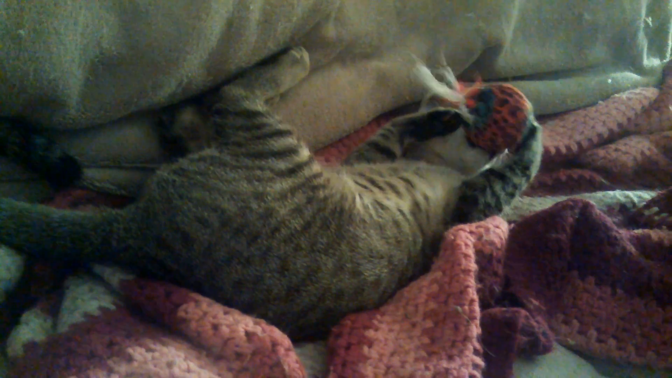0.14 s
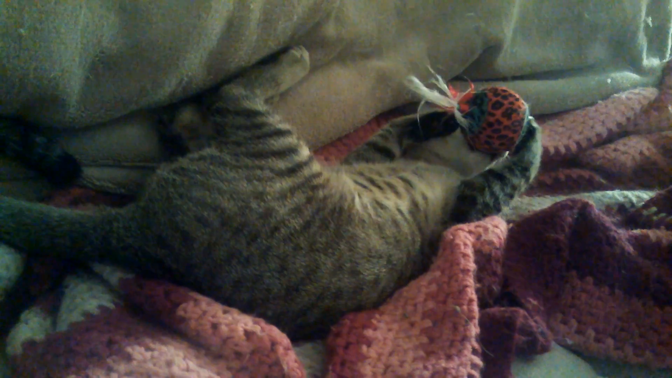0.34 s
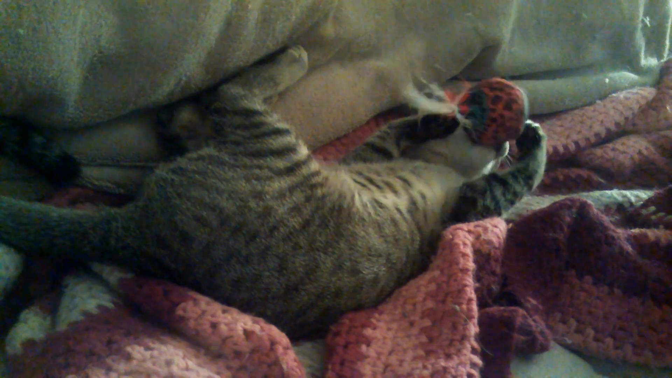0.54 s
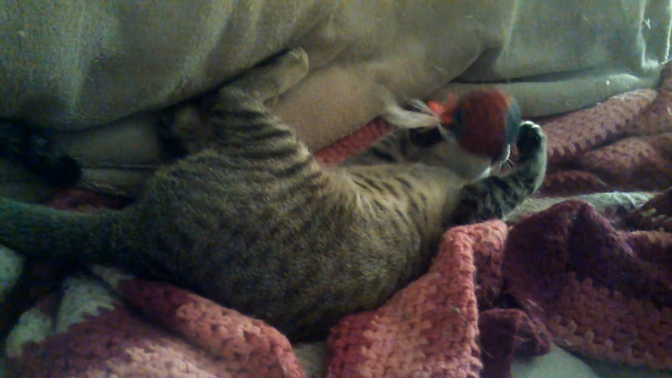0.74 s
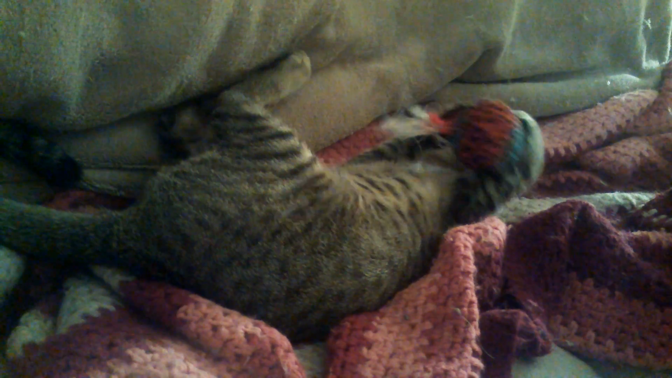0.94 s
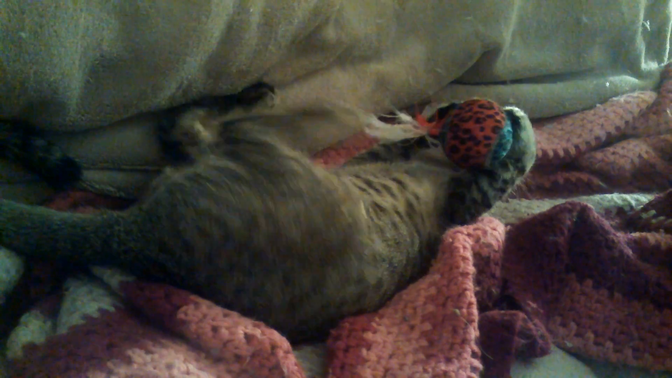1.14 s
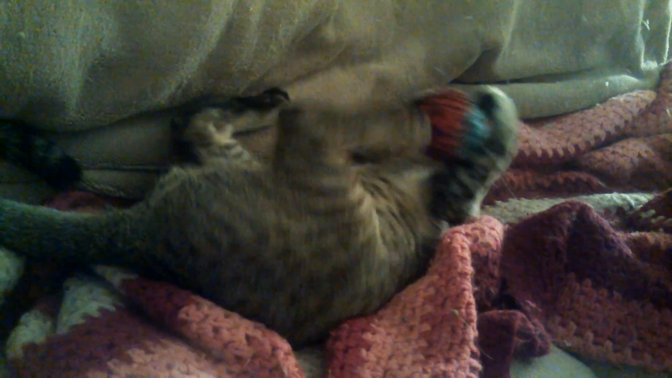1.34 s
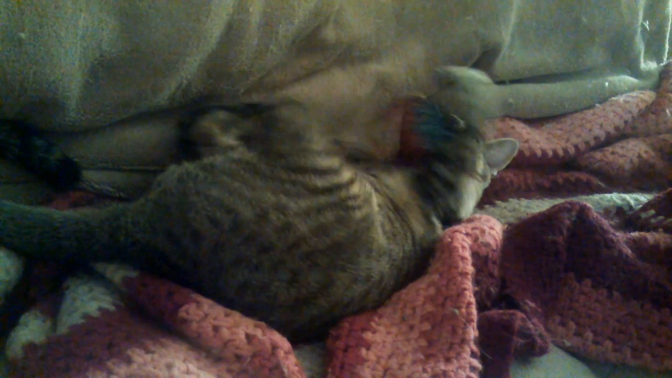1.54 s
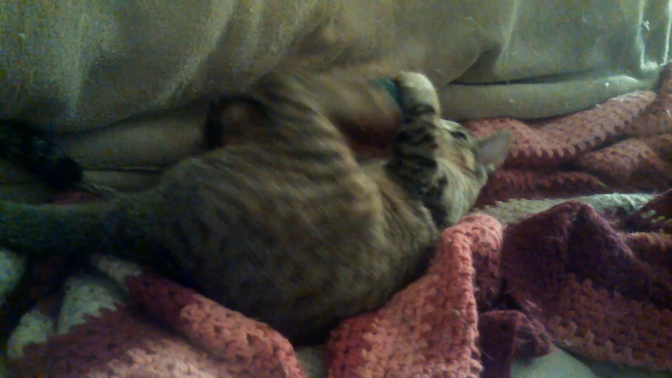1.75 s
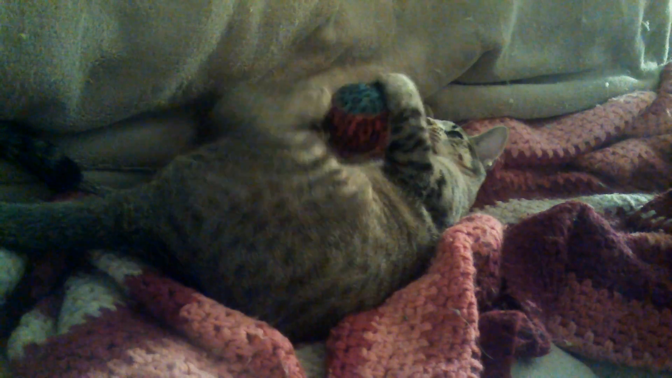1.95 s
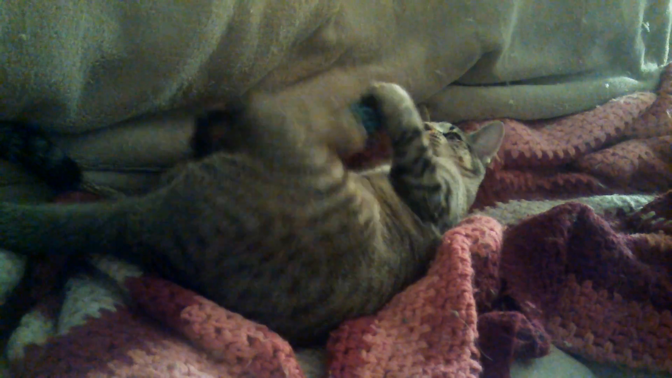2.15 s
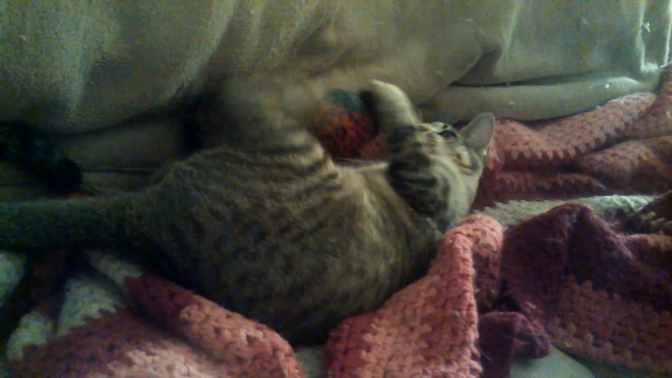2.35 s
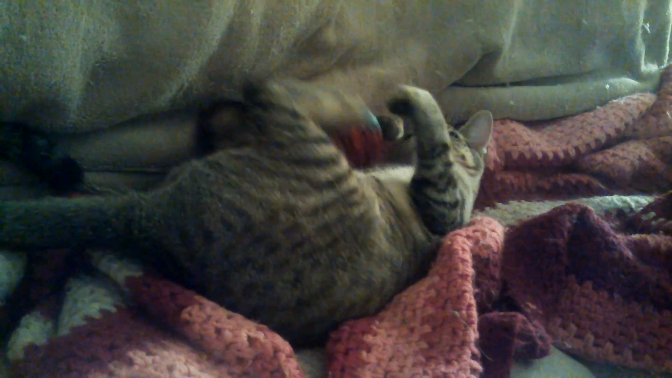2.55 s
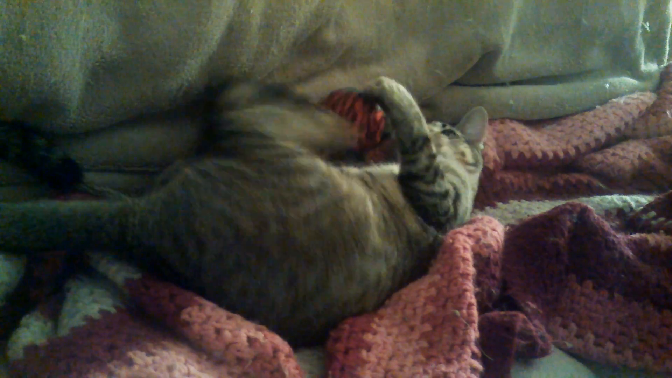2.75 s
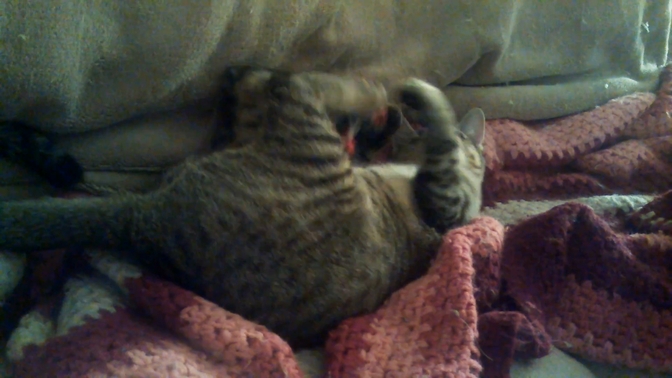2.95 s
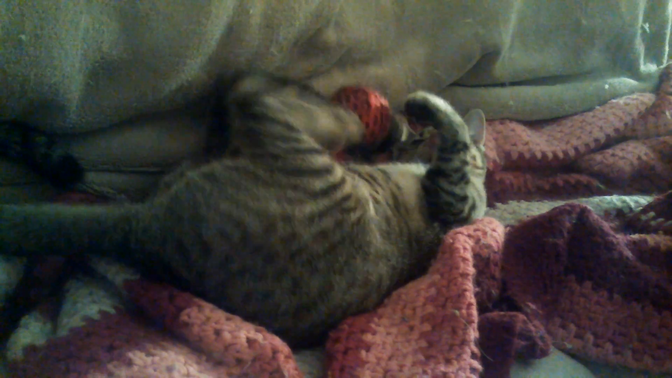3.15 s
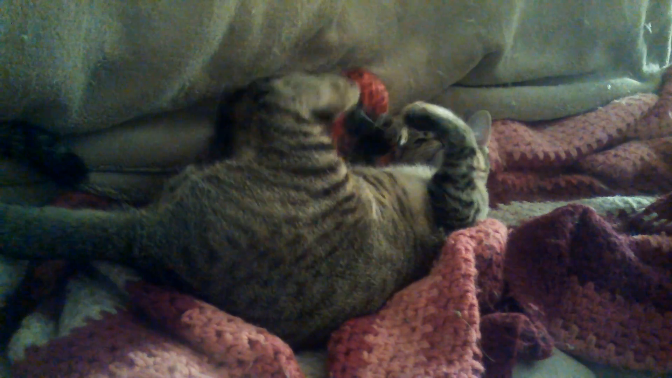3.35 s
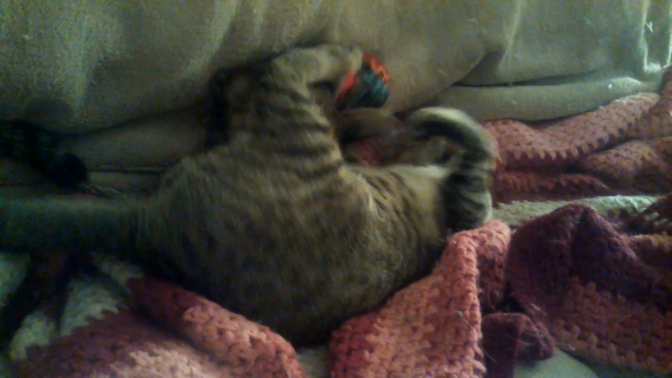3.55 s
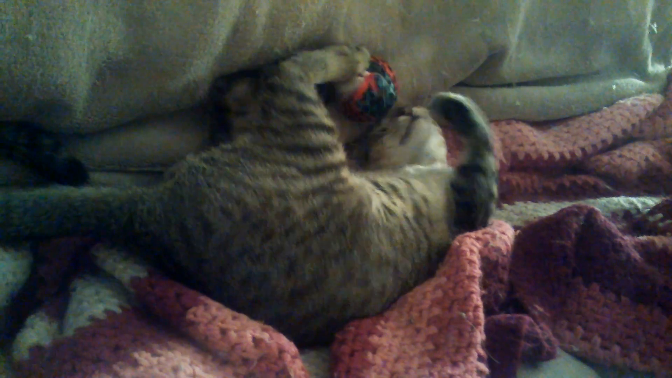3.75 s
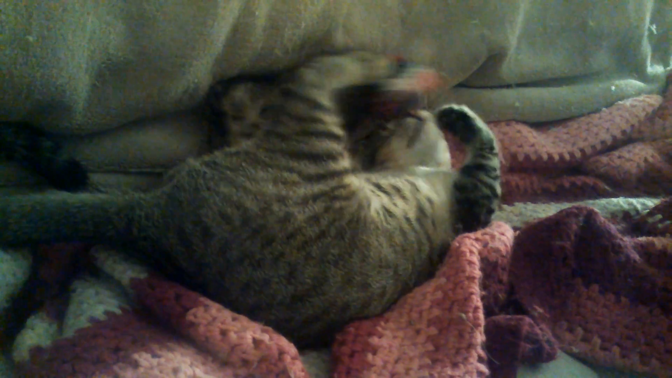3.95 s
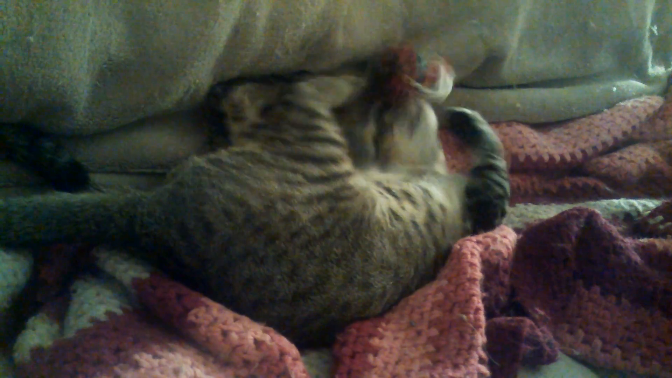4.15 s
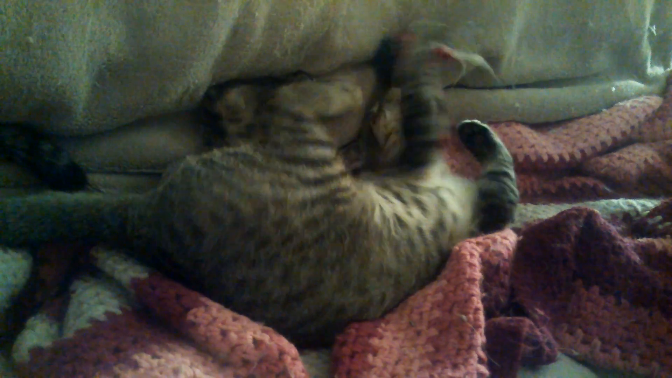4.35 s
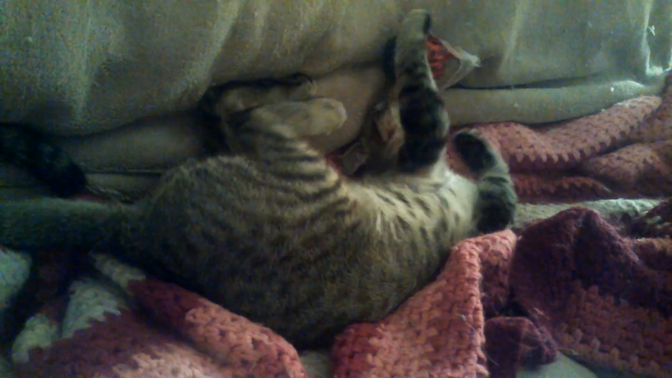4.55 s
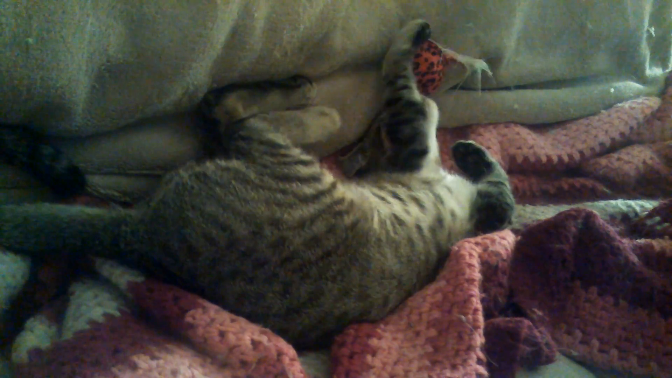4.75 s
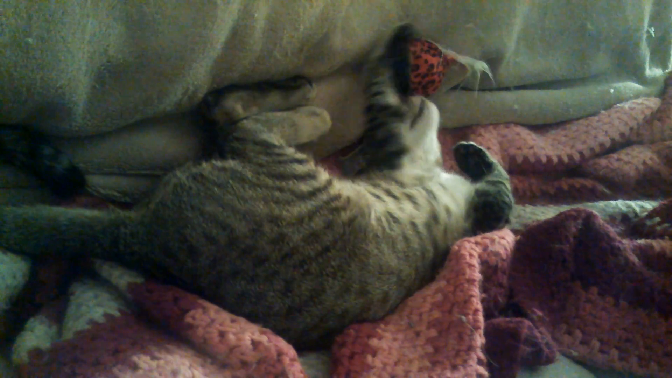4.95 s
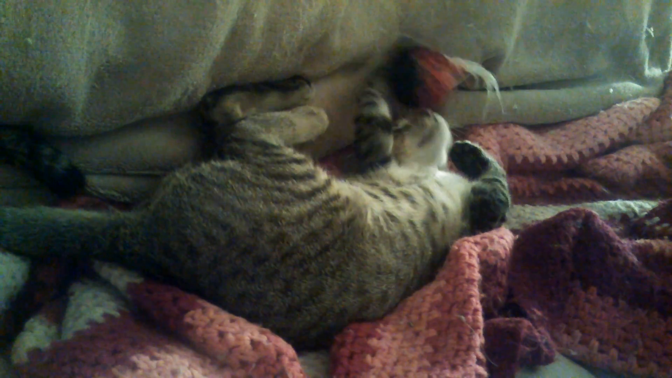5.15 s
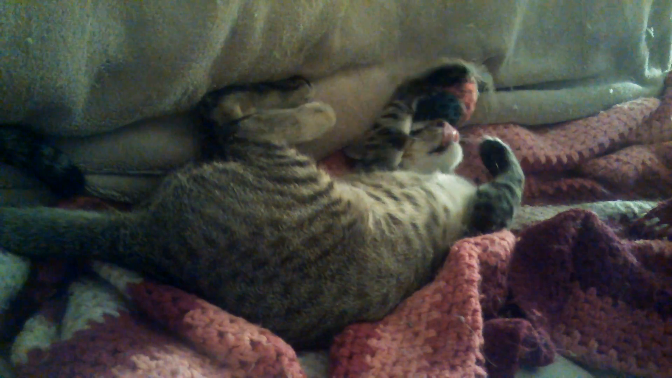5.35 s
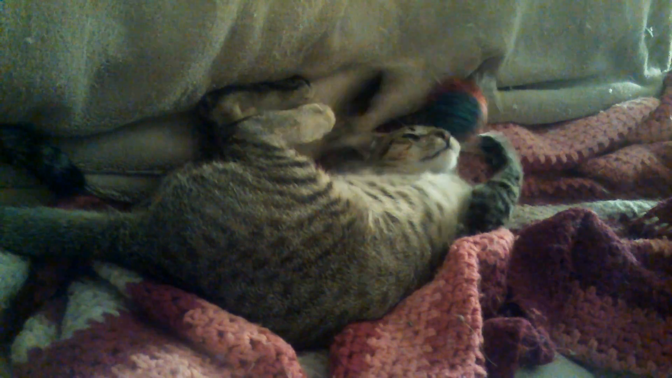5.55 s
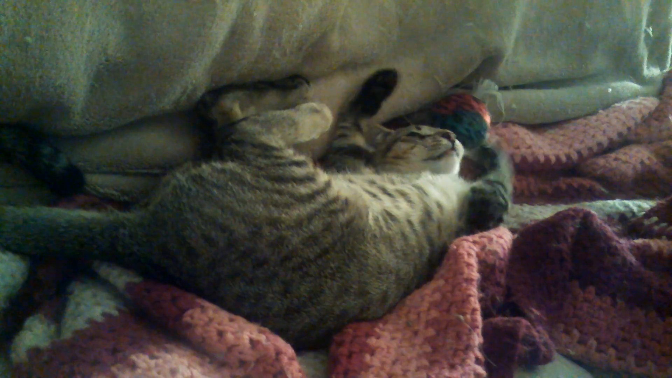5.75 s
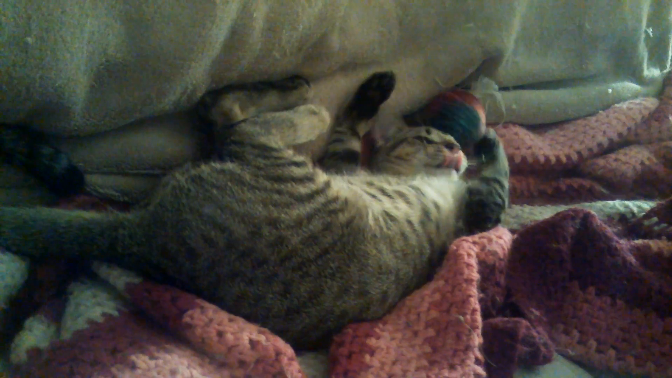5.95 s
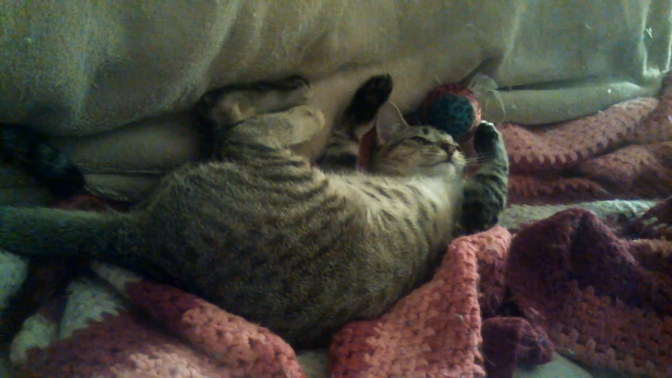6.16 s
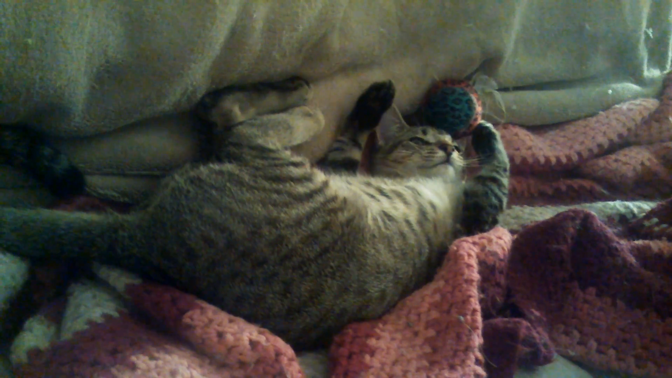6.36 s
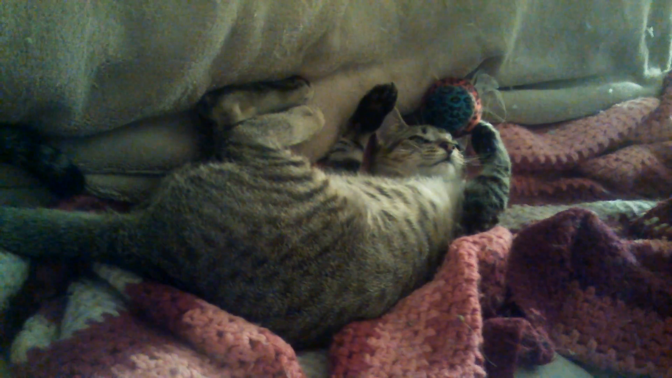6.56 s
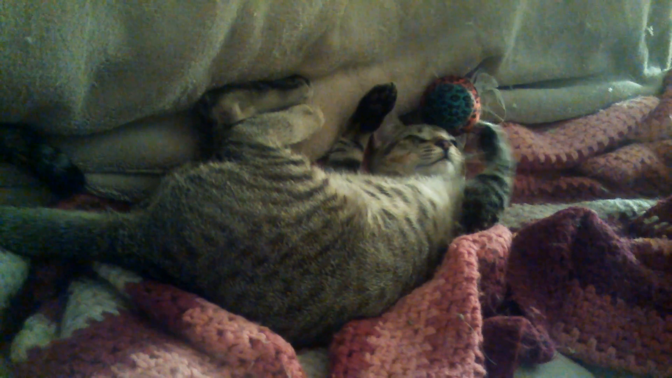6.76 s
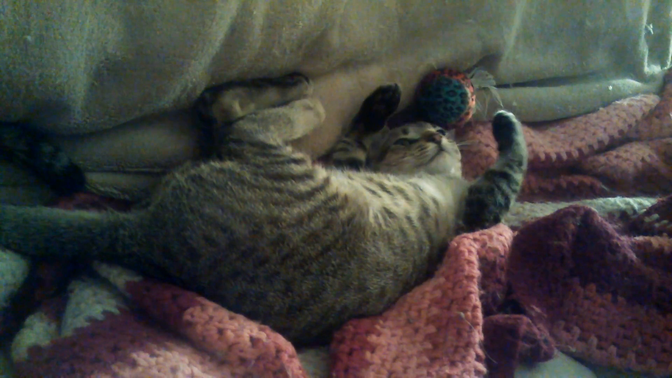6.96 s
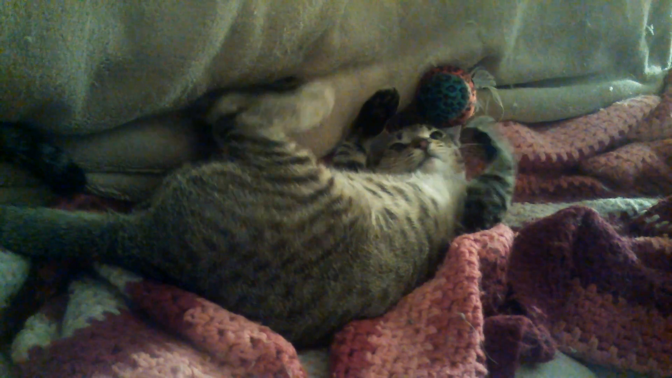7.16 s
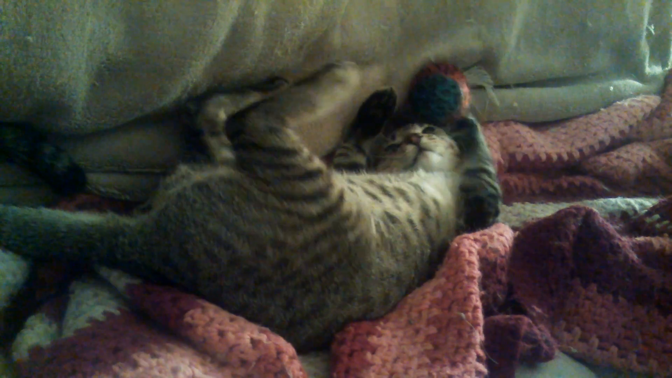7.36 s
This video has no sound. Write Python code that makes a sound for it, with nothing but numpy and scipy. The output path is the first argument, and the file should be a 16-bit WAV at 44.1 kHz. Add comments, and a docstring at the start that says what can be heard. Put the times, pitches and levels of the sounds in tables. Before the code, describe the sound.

A light rattle inside a wool-covered hollow ball is shaken by paws: quick dry clicks, muffled clacks and thin high tinkles, mixed with fibre rustle, brief claw scrapes and soft fur brushing cloth. Bursts come and go, peaking shortly after two seconds and growing busy again near four. One abrupt dry pop interrupts the lull between. The ending is almost still. Handheld microphone very close, wide stereo, barely any reverberation, dull low room rush.

```python
"""Cat with a rattling yarn ball

A cat lies on a blanket in a quiet room, kicking and clawing a yarn ball with a little rattle inside.
The bead's strikes are short noise cracks that set damped sines ringing: the ball's hollow and the shell.
Fur, wool and claws are filtered noise and tiny snaps shaped by the cat's moves; one sharp pop is a brief pulse.
Dull room noise and a faint hum lie below. A close handheld recorder with two ports is widened to stereo."""
import sys
import numpy as np
from scipy import signal
from scipy.fft import rfft, irfft
from scipy.io import wavfile

SR = 44100
rng = np.random.default_rng(int(sys.argv[2]) if len(sys.argv) > 2 else 0)


def file_out(sig):
    """Save sig as 16-bit WAV at sys.argv[1]."""
    # one column per channel
    cols = np.atleast_2d(sig).T
    # limit, then scale
    lim = np.clip(cols, -1, 1)
    pcm = np.round(lim * 32767).astype(np.int16)
    wavfile.write(sys.argv[1], SR, pcm)


N = 329868
TIME = np.arange(N) / SR

# main strikes of the bead on the shell, levels before each layer's trim:
# (time [s], crack level [dB], hollow knock level [dB], low ring level [dB], high ring level [dB])
BEAD_STRIKES = [(0.0918, -50, -45, -69, -60), (0.1231, -24.5, -41, -56, -37), (0.1391, -28, -36, -48, -39),
                (0.1516, -40, -28, -53.5, -54.0), (0.1718, -39, -43, -54, -50),
                (0.1945, -36, -29.5, -54, -56.5), (0.224, -41.5, -37, -57, -50),
                (0.2846, -35, -36.5, -50.5, -47), (0.5569, -38.5, -34.5, -58, -55),
                (0.5869, -50, -41, -62, -59), (0.6218, -54, -37, -61, -63), (0.6267, -45, -41, -59, -56),
                (0.636, -47, -41, -65, -61), (0.6679, -49, -41, -59, -59), (0.6815, -30, -41, -52, -34),
                (0.702, -49, -35, -45, -38.5), (0.709, -37, -46, -46.5, -53),
                (0.714, -37, -31, -50.5, -59.0), (0.724, -50, -45, -64, -45), (0.7574, -57, -42, -60, -47),
                (0.807, -46, -39, -55, -52), (0.815, -43.0, -56.0, -48, -43), (0.82, -41, -49, -51, -42),
                (0.8402, -39, -35, -75.5, -49), (0.8498, -39, -34, -58, -57), (0.8925, -42, -49, -58, -53),
                (0.9012, -47, -48, -62, -57), (0.9925, -31, -59, -42.5, -54), (1.0174, -41, -40, -55, -43),
                (1.0312, -40, -48, -46, -67.5), (1.039, -38, -35, -66, -47),
                (1.2257, -33.5, -36, -48, -68.5), (1.277, -46, -52, -64, -54), (1.3068, -28, -44, -42, -55),
                (1.315, -30, -42, -45, -39), (1.3408, -55, -36, -66, -62), (1.4221, -35.5, -33.5, -49, -67),
                (1.4528, -38, -44, -51, -69.5), (1.5375, -40, -35, -42.5, -59.5),
                (1.567, -41, -38.0, -58, -49), (1.57, -41, -39, -53, -44), (1.5778, -44, -39, -44, -59.5),
                (1.646, -32.5, -31, -45.5, -50), (1.6879, -36, -36, -60, -35.5),
                (1.7435, -48, -39, -53, -50), (1.757, -50, -38, -51, -51), (1.798, -42, -28, -44.5, -65.5),
                (1.831, -44, -55, -42, -40), (1.8445, -36, -31, -50, -53), (1.859, -46, -40, -57, -44),
                (1.8943, -49.0, -29.5, -49, -46), (1.902, -43.5, -27, -51, -52.5),
                (1.912, -50, -24, -57, -43.5), (1.9298, -43, -44, -61, -53), (1.941, -42, -52, -44, -36.5),
                (1.9482, -52, -26.5, -52, -45), (1.9842, -50, -46, -54, -44), (2.1036, -41, -39, -54, -44),
                (2.1143, -38, -28, -51.5, -47), (2.1436, -43, -21.5, -55, -42),
                (2.1515, -21.5, -15.5, -33.5, -24.5), (2.1582, -37.5, -45, -58, -42.5),
                (2.1692, -27, -31, -52, -34), (2.1784, -34, -25, -56, -52.0),
                (2.1836, -31, -28, -42.5, -37.5), (2.2096, -35, -52, -47.0, -62.5),
                (2.217, -35, -31, -65.5, -63.0), (2.2276, -41, -33, -61, -41),
                (2.2408, -38, -27, -54, -68.0), (2.3733, -43, -35, -70, -63), (2.387, -47.5, -37, -64, -57),
                (2.408, -39, -42, -48, -68.5), (2.4644, -27.5, -26.5, -36, -28),
                (2.4861, -34, -36, -54, -30.5), (2.4953, -49, -42, -66, -48), (2.5218, -54, -44, -67, -41),
                (2.5617, -46, -29, -51, -46), (2.5703, -56, -41, -69, -49), (2.5835, -54, -36.5, -68, -45),
                (2.5995, -43, -30.5, -54, -45), (2.6257, -52, -51, -67.0, -44.5),
                (2.6318, -45, -46, -55, -40), (2.652, -48, -38, -65, -43), (2.664, -53, -33, -78.5, -36.5),
                (2.671, -56, -48.5, -70, -53), (2.6842, -57, -30.5, -53, -49),
                (2.706, -52, -33, -66, -38.5), (2.9989, -45, -54, -69, -64), (3.0063, -49, -59, -66, -54),
                (3.071, -59, -30, -58, -57.5), (3.0754, -53, -56.5, -69, -51), (3.1052, -34, -38, -52, -38),
                (3.1123, -46, -37.5, -51, -44.0), (3.122, -37, -34, -51, -39), (3.2583, -45, -41, -59, -51),
                (3.476, -44, -40, -73, -61), (3.7515, -38.0, -37, -64.5, -44),
                (3.7685, -29.5, -29.5, -67, -34), (3.7836, -28, -46, -51, -39), (3.804, -36, -23, -60, -40),
                (3.8182, -33, -52.5, -47, -44), (3.841, -38, -53, -51, -39), (3.9076, -41, -40, -63, -61),
                (3.9335, -45, -46, -60, -55), (3.96, -45, -42, -60, -57), (3.9793, -43, -48, -58, -46),
                (4.0878, -35, -32, -38, -57.5), (4.1001, -36, -32.5, -42, -72.0),
                (4.109, -31, -29.5, -59, -33), (4.1433, -40, -29, -39.5, -41.5),
                (4.1605, -34, -32, -40.5, -38.5), (4.2121, -41, -38, -53, -61),
                (4.2479, -36, -34, -43.5, -53), (4.262, -35, -38, -43.5, -67),
                (4.293, -39, -29, -40.5, -54), (4.3028, -33, -27, -62.5, -52.5),
                (4.3166, -37, -29, -41, -43), (4.3346, -31.5, -41, -44, -54.0),
                (4.3497, -47, -34, -52, -50), (4.392, -42, -50, -46, -61.5), (4.4135, -34.5, -25, -49, -40),
                (4.4215, -56.5, -55, -68, -38), (4.442, -53.0, -36, -47.5, -43),
                (4.4634, -47, -32, -65, -54), (4.5283, -56, -43, -52, -67), (4.5395, -58, -39, -62, -67),
                (4.5548, -62, -40, -64, -75), (4.5952, -61, -47, -52, -71), (5.0755, -47, -55, -67, -72),
                (5.1101, -27.5, -28.5, -50, -39), (5.1145, -29, -26.5, -63.5, -40),
                (5.131, -27.5, -33, -52, -48.5), (5.138, -45, -33, -62, -40), (5.149, -49, -43, -69.5, -43),
                (5.171, -32, -42.5, -67.0, -50.5), (5.182, -45, -42.5, -56, -37),
                (5.1982, -26, -29, -61, -48.0), (5.225, -45, -34.5, -52.5, -36.5),
                (5.27, -44, -48, -65, -49), (5.3095, -47, -42, -59, -72), (5.3835, -46, -47, -62, -77.0),
                (5.46, -43, -35, -65, -50), (5.4854, -49, -40, -67, -54), (5.5089, -44.0, -30, -60, -39),
                (5.512, -42, -33.5, -72, -36), (5.5581, -58, -41, -75, -60), (5.6497, -47, -54, -65, -70),
                (5.6894, -52, -45, -73.0, -53), (5.7172, -52, -40, -79, -52), (6.055, -46, -47, -77, -68),
                (7.352, -59, -42, -72, -51), (7.374, -62, -49, -77, -53)]
# ringing modes of the shell: (pitch [Hz], relative level [dB], time to fall by 60 dB [s])
SHELL_MODES = [(3693, -7, 0.03), (5005, -3.5, 0.037), (5046, -2, 0.056), (5660, -5.5, 0.042),
               (10900, -16, 0.028), (11370, -4, 0.035), (12200, -14, 0.017), (12440, -8, 0.12),
               (12440, 0.5, 0.031), (12670, -6, 0.012), (13050, -5, 0.011), (13600, -7, 0.0052),
               (15300, -10, 0.005)]
# resonances of the ball's hollow: (pitch [Hz], relative level [dB], time to fall by 60 dB [s])
HOLLOW_MODES = [(1510, -14, 0.005), (1674, -6, 0.0063), (1873, -4, 0.0078), (2154, -6, 0.0065),
                (2400, -11, 0.0013)]
# swipes, kicks and tugs of the cat, levels before each layer's trim:
# (start [s], length [s], rub on the wool [dB], knocking of the bead [dB], jingle [dB])
CAT_MOVES = [(0.077, 0.12, -58, -51, -60), (0.552, 0.12, -66, -50, -68), (0.679, 0.014, -50.5, -30, -35.5),
             (0.805, 0.025, -53, -37.5, -50), (0.91, 0.1, -57, -56, -59), (1.245, 0.083, -61, -49, -61),
             (1.426, 0.018, -53.5, -57, -64), (1.546, 0.13, -55.5, -43, -47.5),
             (1.726, 0.063, -55.5, -44, -53), (1.793, 0.055, -51.5, -32.5, -54),
             (1.884, 0.067, -53, -51, -48), (2.135, 0.13, -58, -37, -49), (2.373, 0.012, -63, -43, -58),
             (2.501, 0.019, -51, -29.5, -55), (2.597, 0.0092, -45.5, -35, -39),
             (2.646, 0.047, -55, -46, -51), (2.948, 0.093, -60.5, -72, -64), (3.072, 0.01, -53.5, -52, -54),
             (3.108, 0.022, -51, -60, -57), (3.233, 0.16, -78, -68, -58), (3.75, 0.13, -55.5, -44, -51),
             (3.887, 0.073, -60.5, -43.5, -52), (4.064, 0.14, -57, -43.5, -52),
             (4.268, 0.052, -51, -34, -51), (4.398, 0.09, -57.5, -47, -67), (4.512, 0.059, -65, -38, -77),
             (5.118, 0.067, -56, -53, -52), (5.273, 0.038, -70, -50, -75), (5.462, 0.041, -61, -51, -70),
             (5.684, 0.034, -76, -60, -62)]
# the cat never lies quite still: (time [s], relative level [dB])
FIDGET_LEVEL = [(0.0, -65.5), (1.1, -71), (3.3, -63), (4.8, -69.5), (5.6, -66), (6.6, -76), (7.48, -67.5)]
# the ball is knocked against the cat's body: (time [s], relative level [dB])
BODY_THUDS = [(2.15, -39), (3.806, -57), (4.415, -47), (5.109, -47.5)]
# a claw drags over a taut thread: (start [s], length [s], pitch [Hz], level [dB])
CLAW_SCRAPES = [(0.131, 0.018, 2350, -48), (3.07, 0.014, 3770, -47), (5.648, 0.0062, 6100, -60)]
# fur brushes the cloth: (start [s], length [s], level [dB])
FUR_BRUSHES = [(0.082, 0.037, -60), (0.807, 0.023, -56), (1.784, 0.049, -48), (3.358, 0.032, -62),
               (3.498, 0.023, -51.5), (4.052, 0.076, -50)]
# room noise, sinking a little at the end: (time [s], relative level [dB])
ROOM_LEVEL = [(0.0, -57.5), (6.3, -57.5), (7.48, -60.5)]
# faint hum in the room: (pitch [Hz], level around which it wavers [dB])
HUM_TONES = [(199.2, -62.5), (402, -72)]
# tone colour of the bead's cracks: (frequency [Hz], gain [dB])
CRACK_SPECTRUM = [(300, -12), (1200, -26.5), (2000, -10), (2800, -18), (4000, -7), (6800, -7), (9200, -1),
                  (11000, -1), (13000, -4), (15300, -3)]
# tone colour of the dull bumps: (frequency [Hz], relative gain [dB])
THUD_SPECTRUM = [(80, -18), (200, -10), (450, 2), (900, -23), (1450, 11), (2200, -21), (6000, -32)]
# tone colour of the wool: (frequency [Hz], relative gain [dB])
WOOL_SPECTRUM = [(300, -2), (1100, -26), (2000, 8.5), (2800, -3), (4000, 5), (6500, -5.5), (9200, 0.5),
                 (11000, -15), (13000, 2.5), (15300, -1.5)]
# tone colour of the fur: (frequency [Hz], relative gain [dB])
FUR_SPECTRUM = [(1000, -28), (4000, -7), (6500, -1), (9000, 0), (12000, -3), (15000, 1.5)]
# tone colour of the room noise: (frequency [Hz], relative gain [dB])
AIR_SPECTRUM = [(20, -23), (38, 2), (60, 7), (110, 1), (200, -0.5), (400, -3.5), (600, -10.5),
                (1000, -15.5), (1500, -19), (2450, -24.5), (3200, -24.5), (5000, -30), (9000, -28.5),
                (11000, -31.5), (15000, -28)]

HIGH_RING_FROM_HZ = 8000
DETUNE_STEP = 0.0028  # share of the pitch per detuning step
REBOUND_S, REBOUND_LOSS_DB = 0.01, 14.5  # mean gap, mean loss on each rebound
MOVE_ATTACK_S, MOVE_RELEASE_S = 0.01, 0.042
# delay from port to port in samples: for sound from the side, and from the ball's hollow on the left
PORT_LAG, HOLLOW_LAG = 16, 8
CUTOFF_HZ = 15500


def all_strikes(count=700, spread_db=5.5, vary_db=1.0, idle_db=-11.0):
    """Between main strikes and rebounds the bead chatters unevenly, as hard as the cat moves the ball."""
    times = (np.arange(count) + rng.random(count)) / count * TIME[-1]
    chance = rng.standard_normal((count, 5))
    idle = from_db(np.interp(times, *np.transpose(FIDGET_LEVEL)) + idle_db)
    rub, knocking, jingle = (np.hypot(effort(times, CAT_MOVES, column=k), idle) for k in range(3))
    # crack, knock, low ring and high ring, each with its trim in dB
    levels = 20 * np.log10(np.transpose([rub, knocking, knocking, jingle])) + [-2.0, -2.5, -23.0, -5.0]
    # a shared chance makes a whole strike hard or soft; the rest varies each layer alone
    levels = levels + spread_db * np.minimum(chance[:, :1], 1.5) + vary_db * chance[:, 1:]
    chatter = np.column_stack([times, levels])
    return np.vstack([BEAD_STRIKES, rebounds(), chatter])


def rebounds(count=2, vary_db=4.5):
    """After a main strike the bead bounces on, unevenly and on average ever more weakly."""
    rows, out = np.array(BEAD_STRIKES), []
    for _ in range(count):
        gaps = REBOUND_S * (.5 + rng.random((len(rows), 1)))
        changes = vary_db * rng.standard_normal(rows[:, 1:].shape) - REBOUND_LOSS_DB
        rows = rows + np.hstack([gaps, changes])
        out.append(rows[rows[:, 0] < TIME[-1]])
    return np.vstack(out)


def cracks(strikes, crack_db=2.0, crack_s=0.00034, left_db=4.5, direct_db=-1.5):
    """Each contact is a very short crack of noise, then a faint skid of the bead."""
    rise_s, skid_db, skid_s = .0001, -15.0, .0018
    times, db = strikes.T[:2]
    power = fade(clicks_at(times, from_db(db) ** 2), rise_s) / (rise_s * SR)
    envelope = np.sqrt(fade(power, crack_s) + from_db(skid_db) ** 2 * fade(power, skid_s))
    direct = from_db(direct_db) * from_right(envelope * rng.choice([-1, 1], N))
    diffuse = lean(left_db) * envelope * rng.choice([-1, 1], (2, N))
    return from_db(crack_db) * colour(diffuse + direct, CRACK_SPECTRUM)


def knocks(strikes, knock_db=0.5, scatter_db=-14.0, vary_db=3.0):
    """The hollow of the ball answers each strike with damped sines; the yarn damps it at once."""
    times, _, db = strikes.T[:3]
    out = np.zeros((2, N))
    for k, (hz, mode_db, t60) in enumerate(HOLLOW_MODES):
        chance = rng.standard_normal((len(times), 3))
        # neighbouring modes start with opposite sign
        direct = (-1) ** k * clicks_at(times, from_db(db + mode_db + vary_db * chance[:, 0]))
        scatter_size = from_db(db + mode_db + scatter_db)
        scattered = np.array([clicks_at(times, scatter_size * c) for c in chance.T[1:]])
        out += ring(np.array([direct, late(direct, HOLLOW_LAG)]) + scattered, hz, t60)
    return from_db(knock_db) * no_bass(out)


def shell(strikes, low_db=4.0, high_db=0.5, right_db=-13.0, vary_db=2.0):
    """Each strike starts all shell modes with new strengths, each mode at random a little flat or sharp."""
    times, _, _, low, high = strikes.T
    push = rng.choice([-1, 1], len(times))
    out = np.zeros((2, N))
    for hz, mode_db, t60 in SHELL_MODES:
        chance = rng.standard_normal((len(times), 2))
        detunings = rng.integers(-2, 3, len(times))
        db = high + high_db if hz > HIGH_RING_FROM_HZ else low + low_db
        size = push * from_db(db + mode_db + vary_db * chance[:, 0])
        for step in range(-2, 3):
            chosen = size * (detunings == step)
            left = clicks_at(times, chosen)
            right = clicks_at(times, from_db(right_db) * chosen * chance[:, 1])
            out += ring(np.array([left, right]), hz * (1 + step * DETUNE_STEP), t60)
    return no_bass(out)


def no_bass(x, edge_hz=1070.0):
    """High-pass that keeps the knocks and the shell's ringing free of low tones."""
    return signal.sosfilt(signal.butter(2, edge_hz, "high", fs=SR, output="sos"), x)


def thuds(thud_s=0.0043):
    """The ball bumps dully on the cat's body: noise whose power dies away with this time constant."""
    times, db = np.transpose(BODY_THUDS)
    envelope = np.sqrt(fade(clicks_at(times, from_db(db) ** 2), thud_s))
    return envelope * rms_one(colour(rng.standard_normal((2, N)), THUD_SPECTRUM))


def wool(direct_db=-6.0, left_db=-4.5):
    """Fibres slip under the paws as a hiss, and snag on the claws as separate tiny snaps."""
    rub_db, snag_db, patchy_db = -6.5, -3.3, 1.5
    snag_s, snags_per_s, snag_spread_db = .0003, 200, 3.2
    snags = rms_one(np.sqrt(fade(grains(snags_per_s, snag_spread_db) ** 2, snag_s)))
    direct = from_db(direct_db) * from_right(rng.standard_normal(N))
    slips = lean(left_db) * rng.standard_normal((2, N)) + direct
    hiss = from_db(rub_db) * rms_one(colour(slips, WOOL_SPECTRUM))
    snaps = from_db(snag_db) * rms_one(colour(slips * snags, WOOL_SPECTRUM))
    return rubbing() * from_db(patchy_db * drift(rate=58)) * (hiss + snaps)


def rubbing():
    """Gain of the rubbing on the wool: the moves on top of the fidgeting."""
    coarse_s = TIME[::64]
    moves = np.interp(TIME, coarse_s, effort(coarse_s, CAT_MOVES, column=0))
    return np.hypot(moves, from_db(in_time(FIDGET_LEVEL)))


def effort(seconds, moves, column):
    """Each move swells up to its start, holds and dies away; overlapping moves add in power."""
    power = 0
    for start, length, *levels in moves:
        rise = np.exp(np.minimum(seconds - start, 0) / MOVE_ATTACK_S)
        fall = np.exp(-np.maximum(seconds - start - length, 0) / MOVE_RELEASE_S)
        power = power + (from_db(levels[column]) * rise * fall) ** 2
    return np.sqrt(power)


def scrapes(t60=0.011, slips_per_s=700, slip_spread_db=1.5):
    """The claw sticks and slips in quick, uneven steps, and the thread rings briefly at each, on the left."""
    out = np.zeros(N)
    for start, length, hz, db in CLAW_SCRAPES:
        slips = grains(slips_per_s, slip_spread_db)
        dragging = (TIME > start) & (TIME < start + length)
        out += from_db(db) * ring(slips * dragging, hz, t60) / np.std(ring(slips, hz, t60))
    return np.array([out, np.zeros(N)])


def fur():
    """Fur sliding on smooth cloth gives a soft, fine high hiss."""
    hiss = rms_one(colour(rng.standard_normal((2, N)), FUR_SPECTRUM))
    return effort(TIME, FUR_BRUSHES, column=0) * hiss


def swish(swish_db=-55.5, from_hz=860.0, to_hz=479.0, width_hz=280.0):
    """One soft, hollow brush as the cat shifts; its resonance falls, and both ports hear it alike."""
    at_s, width_s = 3.696, .019
    envelope = np.exp(-.5 * ((TIME - at_s) / width_s) ** 2)
    hz = np.interp(TIME, [at_s - width_s, at_s + width_s / 4], [from_hz, to_hz])
    # narrow complex noise, shifted up to the falling pitch
    noise = rng.standard_normal(N) + 1j * rng.standard_normal(N)
    spread = signal.lfilter(*signal.butter(2, width_hz, fs=SR), noise)
    band = np.real(spread * np.exp(2j * np.pi * np.cumsum(hz) / SR))
    return from_db(swish_db) * envelope * rms_one(band)


def pop(pop_db=-18.0, length_s=0.00195, droop_hz=71.0, dull_hz=3420.0, ring_hz=594.0, ring_db=-13.5):
    """A single dry pop: a 2 ms pulse, alike in both channels but for its fizz, wobbles, sags and stops abruptly."""
    start, sag_s, fizz_db = 2.7938, .0045, -12.0
    age = np.maximum(TIME - start, 0)
    wobble = from_db(ring_db) * np.sin(2 * np.pi * ring_hz * age)
    fizz = from_db(fizz_db) * rng.standard_normal((2, N))
    pulse = (age > 0) * (age < length_s) * np.exp(-age / sag_s)
    band = signal.butter(1, [droop_hz, dull_hz], "band", fs=SR)
    return from_db(pop_db) * signal.lfilter(*band, pulse * (1 + wobble + fizz))


def reflections(x, wet_db=-14.5, t60=.16):
    """The soft furnishings send back a short, faint tail of decaying noise."""
    t = TIME[:SR // 3]
    tail = rng.standard_normal((2, len(t))) * from_db(-60 * t / t60) * (t > .004)
    tail /= np.sqrt(np.sum(tail ** 2, axis=1, keepdims=True))
    return from_db(wet_db) * signal.fftconvolve(x, tail, axes=1)[:, :N]


def room_noise(air_db=8.0, shared_hz=214.0, direct_db=-12.5, left_db=9.5):
    """A dull steady rush, partly shared by both ports in the bass, partly coming from the right."""
    shared = signal.lfilter(*signal.butter(2, shared_hz, fs=SR), rng.standard_normal(N))
    direct = from_db(direct_db) * from_right(rng.standard_normal(N))
    air = lean(left_db) * rng.standard_normal((2, N)) + shared + direct
    return from_db(in_time(ROOM_LEVEL) + air_db) * rms_one(colour(air, AIR_SPECTRUM))


def hum(waver_share=.005, waver_db=3.0):
    """Two faint sines that waver a little in pitch and level, alike in both ports."""
    out = np.zeros(N)
    for hz, db in HUM_TONES:
        phase = 2 * np.pi * np.cumsum(hz * (1 + waver_share * drift(rate=14))) / SR
        out += np.sqrt(2) * from_db(db + waver_db * drift(rate=9.9)) * np.sin(phase)
    return np.array([out, out])


def from_db(db):
    """Amplitude gain of a level in dB."""
    return 10 ** (np.asarray(db) / 20)


def rms_one(x):
    """Scale to an rms of 1."""
    return x / np.sqrt(np.mean(x ** 2) + 1e-20)


def in_time(rows):
    """Join the points of a curve by straight lines."""
    return np.interp(TIME, *np.transpose(rows))


def drift(rate):
    """Slow random curve of rms 1, with this many knots per second."""
    knots = rng.standard_normal(int(N / SR * rate) + 2)
    return rms_one(np.interp(TIME * rate, np.arange(len(knots)), knots))


def colour(x, spectrum):
    """Give a sound a smooth spectrum, through a short minimum-phase filter."""
    size = 4096
    hz, db = np.transpose(spectrum)
    bins_hz = np.arange(size // 2 + 1) * SR / size
    gain = from_db(np.interp(np.log(bins_hz + 1), np.log(hz), db))
    # folding the cepstrum forward makes the filter causal
    cepstrum = irfft(np.log(gain))
    cepstrum[1:size // 2] *= 2
    cepstrum[size // 2 + 1:] = 0
    impulse = irfft(np.exp(rfft(cepstrum)))
    return signal.fftconvolve(np.atleast_2d(x), impulse[None], axes=1)[:, :N]


def ring(clicks, hz, t60):
    """A two-pole resonator: a unit click sets a damped sine of height 1 ringing."""
    r, w = from_db(-60 / (t60 * SR)), 2 * np.pi * hz / SR
    return signal.lfilter([0, np.sin(w)], [1, -2 * r * np.cos(w), r * r], clicks + 1e-18)


def clicks_at(times, sizes):
    """One click at each time."""
    out = np.zeros(N)
    out[np.round(times * SR).astype(int)] = sizes
    return out


def grains(per_s, spread_db):
    """Random clicks of uneven size; rms 1."""
    sizes = from_db(spread_db * np.minimum(rng.exponential(1, N), 4)) * rng.choice([-1, 1], N)
    return rms_one(sizes * (rng.random(N) < per_s / SR))


def fade(clicks, seconds):
    """Each click starts a power that dies away exponentially."""
    return signal.lfilter([1], [1, -np.exp(-1 / (seconds * SR))], clicks + 1e-18)


def late(x, lag=PORT_LAG):
    """Delay by the time that sound takes from one port to the other."""
    return np.concatenate([np.zeros_like(x[..., :lag]), x[..., :-lag]], axis=-1)


def from_right(x):
    """Sound from the right reaches the left port late."""
    return np.array([late(x), x])


def lean(left_db):
    """Gains that favour the left port by this much, with constant total power."""
    return rms_one(from_db([[left_db / 2], [-left_db / 2]]))


def scene():
    """The ball and the blanket in a soft room, with one pop and the room's own noise; one row per port."""
    strikes = all_strikes()
    ball = cracks(strikes) + knocks(strikes) + shell(strikes) + thuds()
    play = ball + wool() + scrapes() + fur() + swish()
    return play + reflections(play) + pop() + room_noise() + hum()


def record(dry, left_db=-0.5):
    """Each channel is one port minus the delayed other port, which widens the image; the top is cut."""
    cross, bass_hz, left_bass_db = .985, 1500, -1.2
    left, right = dry - cross * late(dry[::-1])
    # the left channel is slightly weaker, most of all in the lows
    left_bass = signal.filtfilt(*signal.butter(2, bass_hz, fs=SR), left)
    left = from_db(left_db) * (left + (from_db(left_bass_db) - 1) * left_bass)
    return signal.sosfilt(signal.ellip(10, .2, 70, CUTOFF_HZ, fs=SR, output="sos"), [left, right])


dry = scene()
out = record(dry)
file_out(out)
```